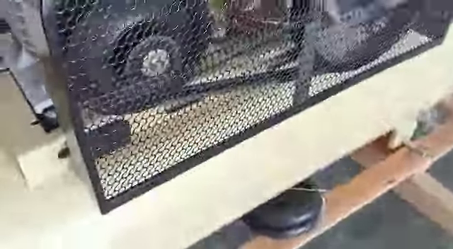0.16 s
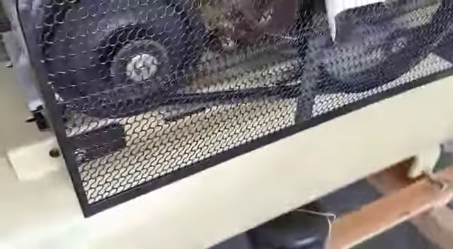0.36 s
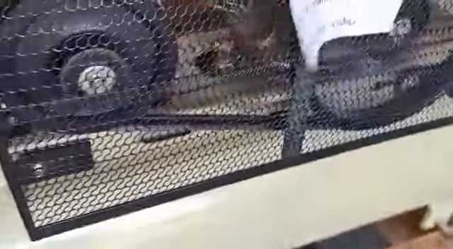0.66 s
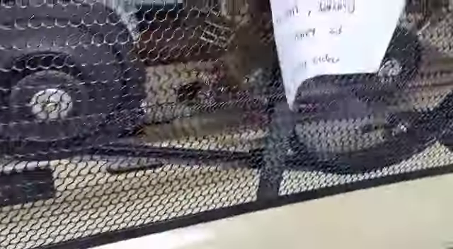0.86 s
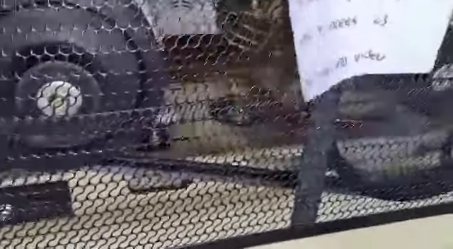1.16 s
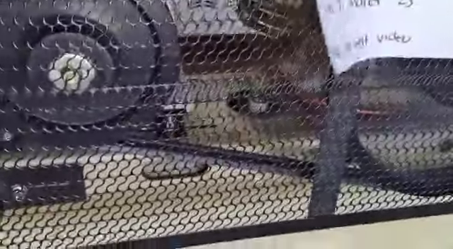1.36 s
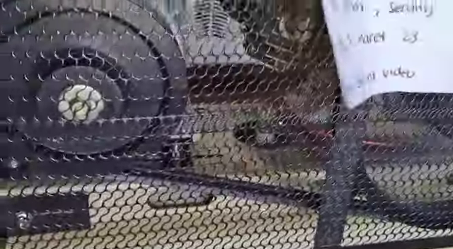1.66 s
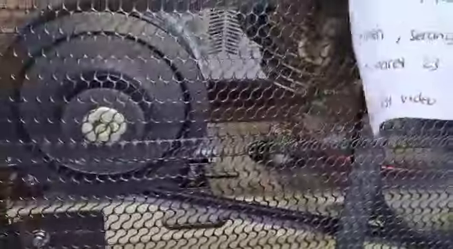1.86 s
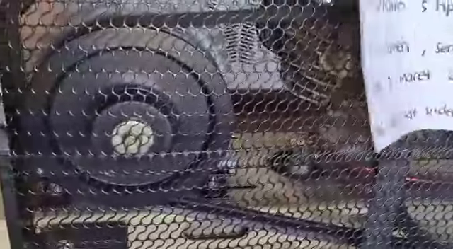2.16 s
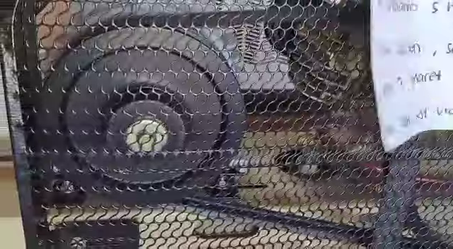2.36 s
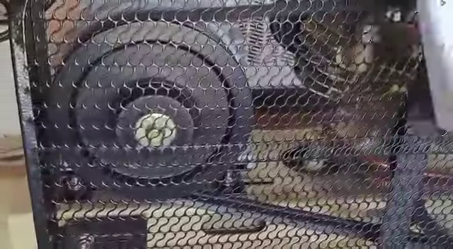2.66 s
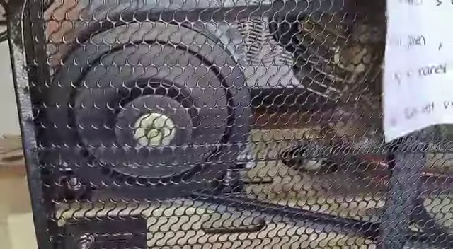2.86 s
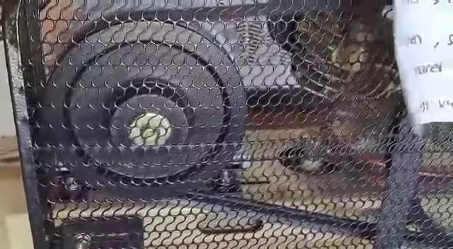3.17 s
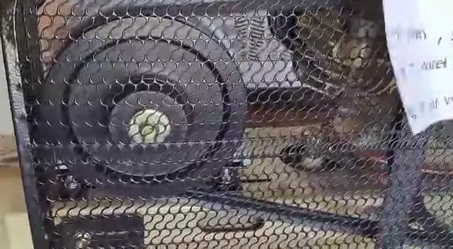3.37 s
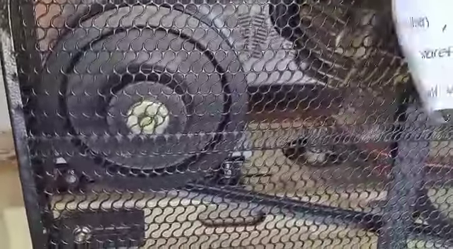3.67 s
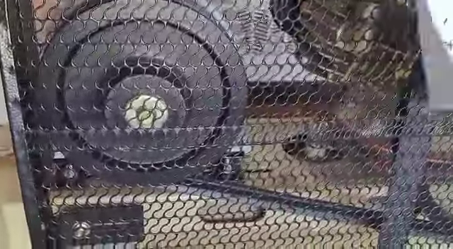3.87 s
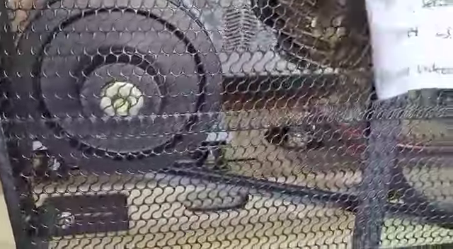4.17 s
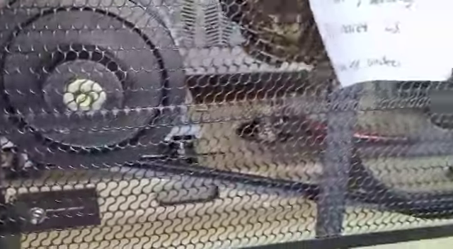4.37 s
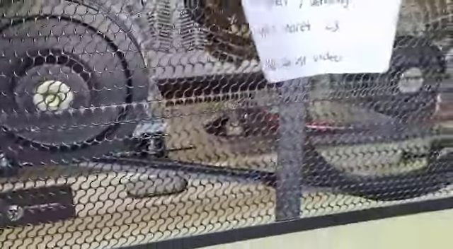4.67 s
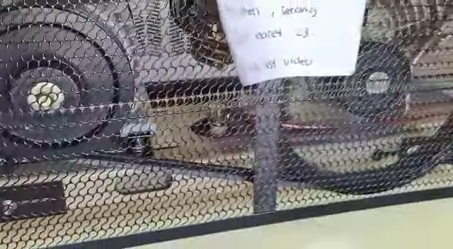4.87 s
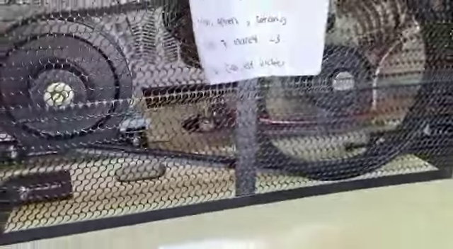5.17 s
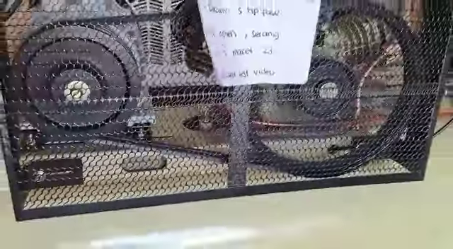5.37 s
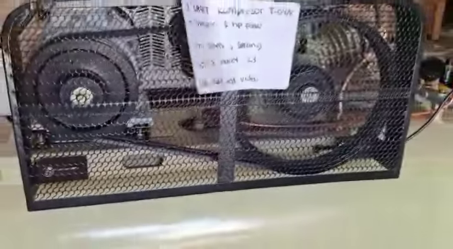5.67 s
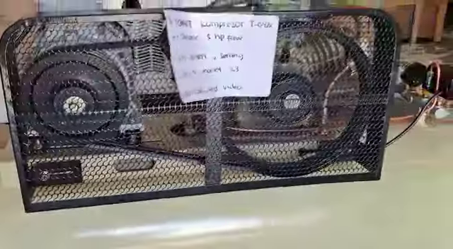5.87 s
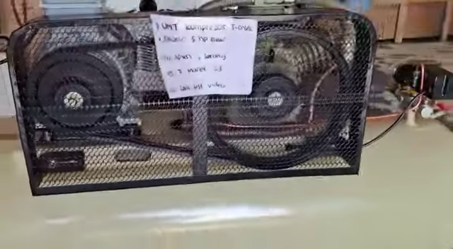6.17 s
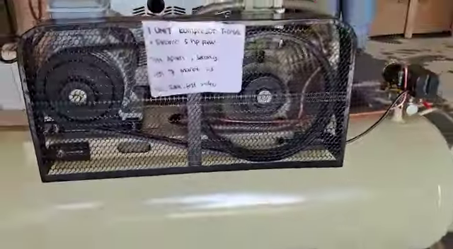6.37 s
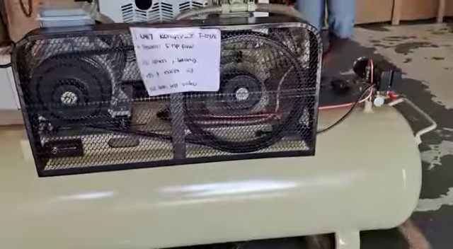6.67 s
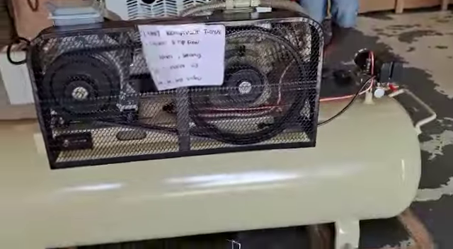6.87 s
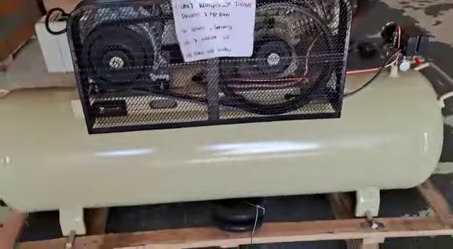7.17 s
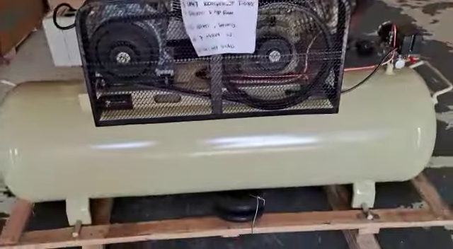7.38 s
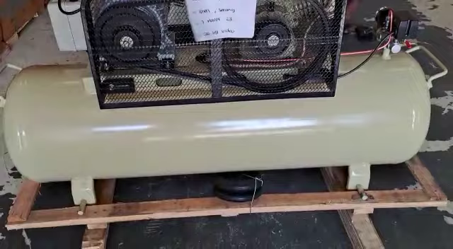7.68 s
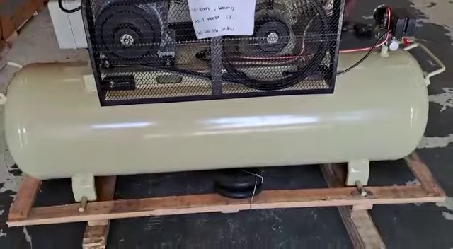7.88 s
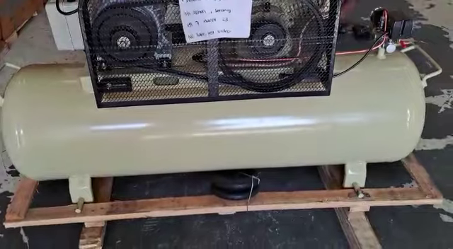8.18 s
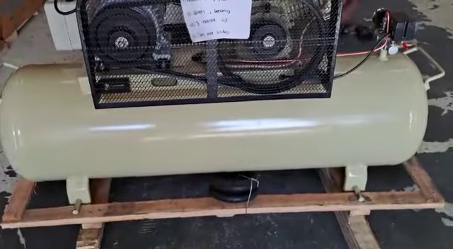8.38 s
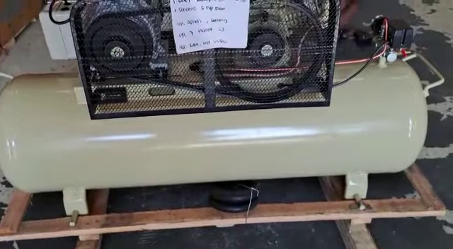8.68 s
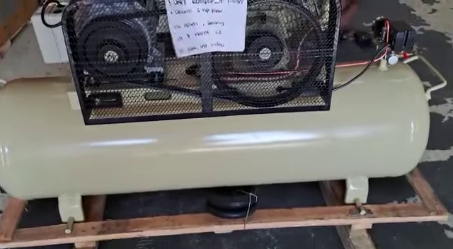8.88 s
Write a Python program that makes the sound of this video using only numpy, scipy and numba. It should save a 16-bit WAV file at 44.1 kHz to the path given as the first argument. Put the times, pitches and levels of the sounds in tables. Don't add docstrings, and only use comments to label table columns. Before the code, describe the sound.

A piston air compressor runs at constant speed in a workshop, heard close at its mesh belt guard. A deep buzzing drone with an uneven three-beat throb carries rushing air, ringing panels and gear clatter. Sharp valve ticks and air puffs repeat about fourteen times a second. Flywheel wind buffets the right side, and two thin squeaks pass. After five seconds the handheld phone draws back and the echo colour shifts.

```python
import sys
import numpy as np
from scipy import signal
from scipy.fft import rfft, irfft, next_fast_len
from scipy.io import wavfile
from scipy.ndimage import uniform_filter1d
from numba import njit

SR = 44100
rng = np.random.default_rng(int(sys.argv[2]) if len(sys.argv) > 2 else 0)


def level_to_linear(level):
    exponent = np.asarray(level, float) / 20
    return 10 ** exponent


def int16_out(signal):
    q = np.round(np.clip(np.atleast_2d(signal).T, -1, 1) * 32767)
    wavfile.write(sys.argv[1], SR, q.astype(np.int16))


N = 398663
TIME = np.arange(N) / SR
FAST = next_fast_len(N, True)
FREQ = np.maximum(np.fft.rfftfreq(FAST, 1 / SR), 1)
PUMP_HZ = 14.288


def curve(table):
    s, *columns = np.transpose(table)
    return [np.interp(TIME, s, column) for column in columns]


def shape(table):
    hz, value = np.transpose(table)
    return np.interp(np.log(FREQ), np.log(hz), value)


def unit(x):
    return x / np.sqrt(np.mean(x ** 2))


def colour(x, gain):
    return irfft(rfft(x, FAST) * gain, FAST)[..., :N]


def walk(rate):
    place = np.arange(0, N, 64) * rate / SR
    count = int(place[-1]) + 2
    steps = np.interp(place, np.arange(count), rng.standard_normal(count))
    smooth = uniform_filter1d(steps, size=int(SR / 64 / rate))
    return 1.3 * np.repeat(smooth, 64)[:N]


def bump(turns, at, width):
    return np.exp((np.cos(2 * np.pi * (turns - at)) - 1) / (2 * np.pi * width) ** 2)


def partial(angle, db, k, sway, apart, quicken=0.0603):
    even, odd = np.sqrt(2) * level_to_linear(db) * np.array([np.cos(angle), np.sin(angle)])
    wander = walk(1.21 + quicken * k) * even + walk(1.09 + quicken * k) * odd
    both = even + sway * min(k, 20) / 3.84 * wander
    differ = apart * k * (walk(0.7) * even + walk(0.77) * odd)
    return np.array([both + differ, both - differ])


# (time [s], rotation rate [Hz])
SHAFT_SPEED = [(0, 25.65), (1.4, 25.68), (2.2, 25.645), (3.6, 25.625), (5, 25.6), (6.8, 25.625),
               (7.4, 25.68), (9.04, 25.655)]


def shaft_turns():
    hz, = curve(SHAFT_SPEED)
    return np.cumsum(hz) / SR - .04


STROKES = [
    (.016, .94, .145, 1.16, .352, 1.0),
    (.36, .64, .496, .62, .661, .51),
    (.678, .88, .805, .72, .72, 1.0),
]
# (multiple of the shaft rate [ratio],
# level close by [dB], level further off [dB])
STROKE_PARTIALS = [(2, -6, -6), (3, 1, 1), (4, -14, -11.5), (5, -4, -3), (6, -14, -19.5), (7, -8.5, -11.5),
                   (8, -13, -8), (9, -30, -11.5), (10, -16.5, -18), (11, -11.5, -12.5), (13, -19.5, -16.5),
                   (14, -22, -20), (15, -30, -25), (16, -14.5, -16.5), (18, -29, -22), (19, -19, -19.5),
                   (20, -38.5, -21.5), (21, -25, -30), (22, -24, -18), (23, -26.5, -21.5),
                   (24, -27.5, -17.5), (25, -22.5, -23), (26, -20.5, -18), (27, -32, -24),
                   (32, -22, -43), (33, -29, -19.5), (34, -32.5, -26), (36, -24, -28.5), (37, -28.5, -24),
                  (38, -32.5, -22), (40, -28, -21), (42, -26, -29.5), (44, -30, -32), (45, -28.5, -32)]
# (multiple of the shaft rate [ratio], level [dB])
SLOT_WHINE = [(59, -55.5), (67, -53), (72, -51.5), (75, -64), (82, -52.5)]


def drone(turns, away, sway=0.048, apart=0.0078):
    drone_db, faint_db, faint_scatter_db = -15.5, -40.5, 3.5
    push_at, push, suck_at, suck, knock_at, knock = np.transpose(STROKES)
    named = {k: (near_db, far_db) for k, near_db, far_db in STROKE_PARTIALS}
    out = 0
    for k in range(2, 47):
        faint = faint_db + faint_scatter_db * rng.standard_normal(size=2)
        near_db, far_db = named.get(k, faint)
        if k < 10:
            at, share = np.r_[push_at, suck_at], np.r_[push, -suck]
        else:
            at, share = knock_at, knock
        if k >= 20:
            share = share * [.4, 2, .9]
        phase = np.angle(np.sum(share * np.exp(-2j * np.pi * k * at)))
        phase += np.clip((k - 9) / 12, 0, 1.1) * rng.standard_normal()
        db = drone_db + near_db + away * (far_db - near_db)
        out = out + partial(2 * np.pi * k * turns + phase, db, k, sway, apart)
    for k, db in SLOT_WHINE:
        whine_db = db + 3 * away + 2.5 * walk(2.51)
        out = out + partial(2 * np.pi * k * turns, whine_db, k, sway, apart / 2)
    return out


# (multiple of the crank rate [ratio], level [dB])
CRANK_PARTIALS = [(5, -45), (8, -66), (10, -40), (14, -52), (15, -40.5), (17, -62), (19, -35), (21, -37),
                  (23, -51.5), (25, -43), (30, -44)]


def pump(crank):
    out = 0
    for k, db in CRANK_PARTIALS:
        angle = 2 * np.pi * (k * crank + rng.random())
        out = out + partial(angle, db, k, sway=0.021, apart=0.012)
    return out


def valve(crank, db, ring_hz=5350):
    turn = np.floor(crank - .405).astype(int) + 2
    since = (crank - .405) % 1 / PUMP_HZ
    size, tune, lean = rng.standard_normal((200, 3))[turn].T
    snap = level_to_linear(.9 * size) * (since / .0007) ** 2 * np.exp(-since / .0008)
    snap = snap + .35 * np.roll(snap, 330)
    snap = snap + .27 * np.roll(
        level_to_linear(.9 * size) * (since / .0007) ** 2 * np.exp(-since / .0008) * level_to_linear(4 * np.clip(tune, -2, 1.5)), 760
    ) + .35 * .27 * np.roll(np.roll(
        level_to_linear(.9 * size) * (since / .0007) ** 2 * np.exp(-since / .0008), 330), 760) * 0
    ping = np.sin(2 * np.pi * ring_hz * (1 + 0.005 * tune) * since + 3 * lean)
    noise = rng.standard_normal((2, N))
    clack = unit(colour(noise, 1 / (1 + 1j * (FREQ - 4900) / 1100) ** 2))
    leak = unit(colour(noise, 1 / (1 + 1j * (FREQ - ring_hz) / 450) ** 2))
    struck = level_to_linear([[0], [-4]]) * unit(snap * (ping + .35 * clack))
    return level_to_linear(db - 10) * (struck + .5 * leak * bump(crank, .7, .13))


# (frequency [Hz], spectral level [dB per Hz])
ROAR_SPECTRUM = [(25, -69), (100, -55.5), (260, -54.5), (500, -58.5), (740, -58), (950, -54), (1180, -57),
                 (1330, -65.5), (2500, -65), (5400, -65.5), (6400, -70), (7600, -70), (9000, -89),
                 (12000, -78.5), (15500, -85)]
# (frequency [Hz], likeness [0-1])
PORT_LIKENESS = [(60, 0.99), (130, 0.2), (290, 0.93), (640, 0.6), (1410, 0.17), (3100, 0), (6820, 0.09),
                 (15000, 0)]
# (frequency [Hz], gain [dB])
ROAR_AWAY = [(320, 1.5), (800, -0.6), (3000, 0), (11000, 1.3)]
PUFF_HZ = [2048, 4096, 8192, 16384]
PUFF_DEPTH = [
    (0, .15, 1.1, .85),
    (0, .1, 1.15, 2.05),
]


def roar(turns, crank, away):
    alike = np.clip(shape(PORT_LIKENESS), 0, 1)
    mid, side = rfft(rng.standard_normal((2, FAST)))
    mid, side = mid * np.sqrt((1 + alike) / 2), side * np.sqrt((1 - alike) / 2)
    ports = np.array([mid + side, mid - side]) * level_to_linear(shape(ROAR_SPECTRUM)) * np.sqrt(SR / 2)
    puff = bump(crank, .74, .122) * level_to_linear(.5 * walk(14)) * (1 - 0.51 * away)
    throb = (bump(turns, 0.013, 0.037) + bump(turns, 0.63, 0.15)) * (0.46 + 0.49 * away)
    breeze_hz, breeze_db, breeze_ends_s, breeze_fade_s = 400, 2.5, 4.3, .3
    breeze = (1 - np.tanh((TIME - breeze_ends_s) / breeze_fade_s)) / 2
    away_hz, away_db = np.transpose(ROAR_AWAY)
    out, common = 0, walk(6)
    for hz in 2. ** np.arange(4, 15):
        band = np.cos(np.pi / 2 * np.clip(np.log2(FREQ / hz), -1, 1)) ** 2
        db = np.interp(np.log(hz), np.log(away_hz), away_db) * away + 0.57 * walk(10)
        db = db + (2.5 + breeze_db * breeze) / (1 + (hz / breeze_hz) ** 2)
        depth = np.array([[np.interp(hz, PUFF_HZ, row)] for row in PUFF_DEPTH])
        db = db + depth * (4.93 * puff + 0.45 * common)
        db = db + 3.27 * throb * (hz > 300)
        out = out + level_to_linear(db - 1.5) * irfft(ports * band, FAST)[:, :N]
    return out


# (frequency [Hz], bandwidth [Hz], level close by [dB], level further off [dB])
PANELS = [(1558, 99, -50, -49), (1897, 170, -48, -40), (2070, 100, -49, -50), (2370, 130, -45, -47),
          (2593, 83, -58, -42), (3400, 210, -48, -40.5), (5200, 250, -51, -52)]


def casing(turns, away):
    shake = .5 + bump(turns, 0.025, .08) + bump(turns, 0.77, 0.13)
    out = 0
    for hz, width, near_db, far_db in PANELS:
        mode = 1 / (1 + 2j * (FREQ - hz) / width) ** 2
        ring = colour(shake * rng.standard_normal((2, N)), mode)
        sway_db = 1.8 * walk(4)
        out = out + level_to_linear(near_db + away * (far_db - near_db) + sway_db) * unit(ring)
    return out


# (frequency [Hz], spectral level [dB per Hz])
CLATTER_SPECTRUM = [(1150, -40), (1250, 3), (1550, 6), (1900, 1), (2300, 3), (2700, -2), (3400, -12),
                    (4500, -30)]


def clatter(turns, away, count=6):
    near_db, far_db, trade_per_s = -40.5, -36.5, 5
    hz, db = np.transpose(CLATTER_SPECTRUM)
    multiples_hz = SHAFT_SPEED[0][1] * np.arange(1, 1026)
    spectrum = level_to_linear(np.interp(np.log(multiples_hz), np.log(hz), db, -90, -90))
    places = np.arange(2048) / 2048
    shake = .4 + bump(places, 0.34, 0.064) + bump(places, 0.75, 0.069) + bump(places, 0.015, 0.11)
    out = 0
    for _ in range(count):
        uneven = level_to_linear(4 * rng.standard_normal(1025))
        pattern = irfft(rfft(shake * rng.standard_normal(2048)) * spectrum * uneven)
        heard = np.interp(turns % 1, places, pattern, period=1)
        differ = np.array([walk(trade_per_s), walk(trade_per_s)])
        out = out + heard * (walk(trade_per_s) + 0.43 * differ)
    return level_to_linear(near_db + away * (far_db - near_db)) * unit(out)


@njit
def resonance(x, hz, width):
    y, b, l = np.empty(len(x)), 0., 0.
    for i in range(len(x)):
        g, k = np.tan(np.pi * hz[i] / SR), width / hz[i]
        v = (b + g * (x[i] - l)) / (1 + g * (g + k))
        b, l, y[i] = 2 * v - b, l + 2 * g * v, k * v
    return y


# (time [s], cancelled frequency [Hz], share lost [0-1])
ECHO = [(0, 280, 0.03), (5, 280, 0), (5.5, 282, 0.4), (6.2, 290, 0.7), (6.6, 335, 0.35), (6.8, 365, 0.6),
        (7.1, 400, 0.75), (7.5, 420, 0.4), (8, 513, 0.2), (9.04, 480, 0.33)]


def echo(air):
    lost_hz, lost = curve(ECHO)
    lifted_hz, lifted = 395 + 0.51 * lost_hz, 0.75 * lost
    out = []
    for x in air:
        cancelled = lost * resonance(x, lost_hz, 100.0)
        out.append(x - cancelled + lifted * resonance(x, lifted_hz, 120.0))
    return np.array(out)


# (frequency [Hz], gain [dB])
HAND_SHADE = [(60, -1.5), (200, 0), (1000, -2.5), (2500, -4.5), (5400, -10), (7500, -11), (8300, -0.5),
              (9300, 5), (12000, -3), (13500, -10), (15500, -3.5)]


def shade(x):
    delay = np.exp(-2j * np.pi * FREQ * .00007)
    return colour(x, level_to_linear(shape(HAND_SHADE)) * delay)


# (time [s], level [dB], length [s])
GUSTS = [(.93, -24, 0.037), (1.152, -19.5, 0.074), (1.406, -21, 0.031), (1.65, -33, 0.045),
         (1.957, -15, 0.044), (2.28, -25, 0.024), (2.494, -20.5, 0.084), (2.882, -9.5, 0.022),
         (2.997, -23, 0.068), (3.246, -24, 0.04), (3.5, -30, .03), (3.696, -20, 0.025), (3.89, -23, 0.034),
         (3.999, -13.5, 0.021), (4.123, -20, .025), (4.34, -22, 0.054), (4.605, -24, 0.04),
         (5.046, -14, 0.036), (5.464, -24, 0.041)]
# (frequency [Hz], spectral level [dB per Hz])
RUMBLE_SPECTRUM = [(20, -20), (40, 4), (80, 4), (200, 0), (400, -9), (800, -17.5), (1500, -47), (4000, -69)]
# (frequency [Hz], spectral level [dB per Hz])
FLAP_SPECTRUM = [(100, -11), (250, 12), (700, -14), (1200, -21), (3000, -49)]


def fan_gusts():
    top, flap_share = .4, 2.6
    swell = sum(level_to_linear(db) * np.exp(-.5 * ((TIME - s) / length) ** 2) for s, db, length in GUSTS)
    rumble = colour(rng.standard_normal(N), level_to_linear(shape(RUMBLE_SPECTRUM)))
    rumble = rumble / np.sqrt(uniform_filter1d(rumble ** 2, size=2000))
    flap = unit(colour(rng.standard_normal(N), level_to_linear(shape(FLAP_SPECTRUM))))
    push = swell * level_to_linear(2.7 * walk(40)) * (rumble + flap_share * swell * flap)
    return np.outer([.06, 1.2], top * np.tanh(push / top))


# (time [s], length [s], frequency [Hz], level [dB])
SQUEAKS = [
    (1.235, .1, 13230, -51),
    (3.175, .17, 13210, -46),
]


def seal():
    attack_s, sag_db_per_s, release_s = .012, 45, .04
    out = 0
    for start, length, hz, db in SQUEAKS:
        since = TIME - start
        gate = np.clip(since / attack_s, 0, 1) * np.exp(-np.maximum(since - length, 0) / release_s)
        db = db - sag_db_per_s * np.clip(since, 0, length) + 4.5 * walk(45)
        angle = 2 * np.pi * np.cumsum(hz + 12 * walk(40)) / SR
        out = out + gate * level_to_linear(db) * np.sin(angle)
    return np.outer([1.1, 1.4], out)


# (time [s], distance [0-1], loudness [dB], valve tick as it faces the pump head [dB])
PHONE = [(0, 0.47, -0.5, -34), (1, 0.13, 0, -23), (2.5, 0.04, -.3, -25.5), (3.2, 0, -0.95, -27),
         (3.9, 0.09, -1.2, -27), (4.6, 0.13, -0.2, -26), (5.4, 0.13, -0.9, -31), (6.2, 0.53, -1.3, -45),
         (7, 0.89, -0.44, -34), (8, 1, 0, -39), (9.04, 0.97, -0.3, -34)]


def scene():
    turns = shaft_turns()
    away, loud_db, tick_db = curve(PHONE)
    crank = PUMP_HZ * TIME - 0.0716 * away
    air = level_to_linear(loud_db - 0.46 * away) * drone(turns, away)
    air = air + pump(crank) + valve(crank, tick_db)
    air = air + level_to_linear(loud_db) * (roar(turns, crank, away) + casing(turns, away) + clatter(turns, away))
    air = echo(air)
    air[1] = shade(air[1])
    return air + fan_gusts() + seal()


def low_pass(x):
    return signal.sosfilt(signal.butter(12, 15680, fs=SR, output="sos"), x)


def record(dry):
    thin = signal.sosfilt(signal.butter(1, 12, "high", fs=SR, output="sos"), dry)
    rounded = thin / (1 + (thin / 1.64) ** 4) ** 0.19
    cut = signal.sosfilt(signal.ellip(8, .2, 70, 15700, fs=SR, output="sos"), rounded)
    return low_pass(cut)


dry = scene()
out = record(dry)
int16_out(out)
```